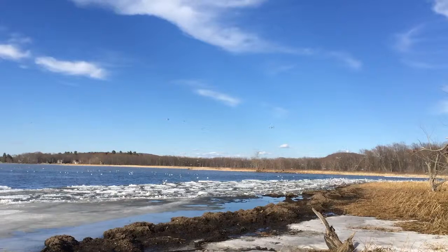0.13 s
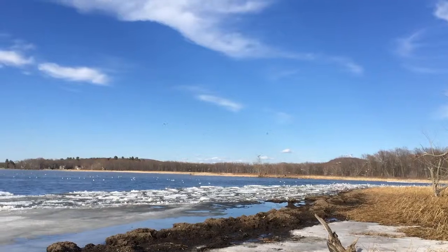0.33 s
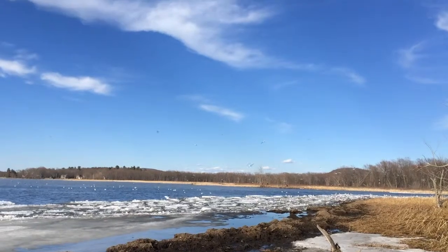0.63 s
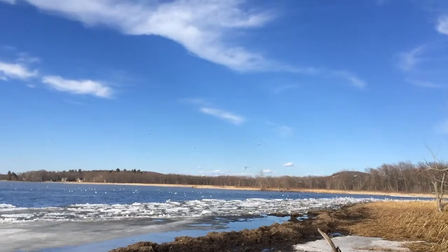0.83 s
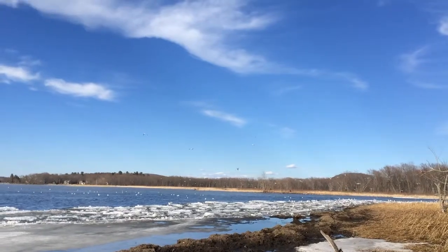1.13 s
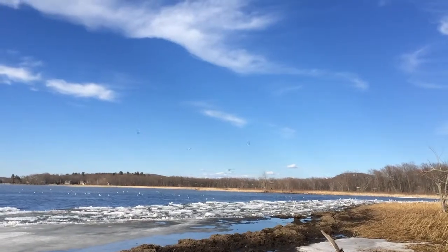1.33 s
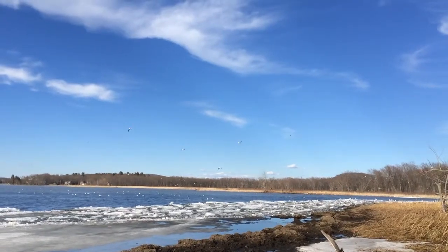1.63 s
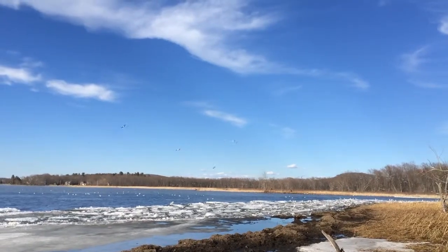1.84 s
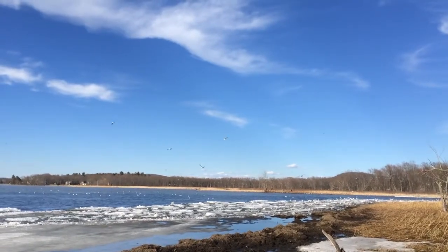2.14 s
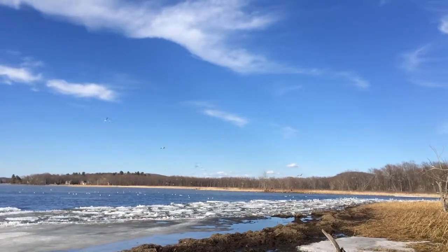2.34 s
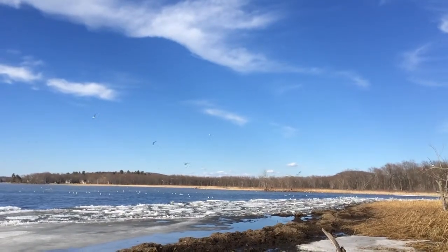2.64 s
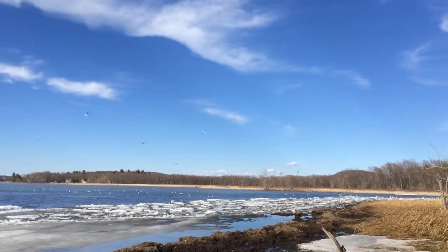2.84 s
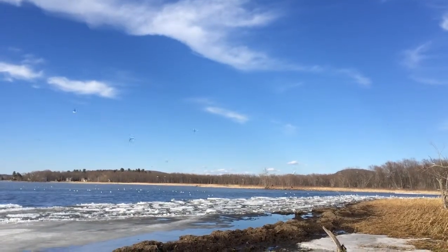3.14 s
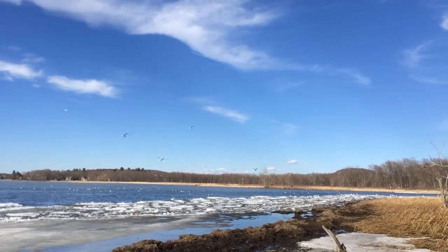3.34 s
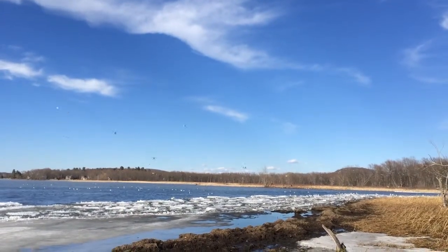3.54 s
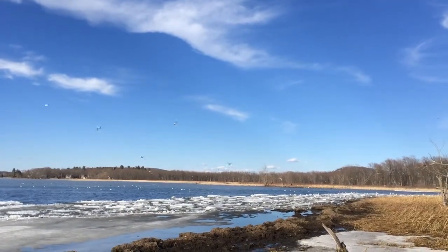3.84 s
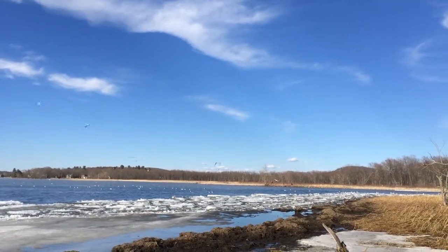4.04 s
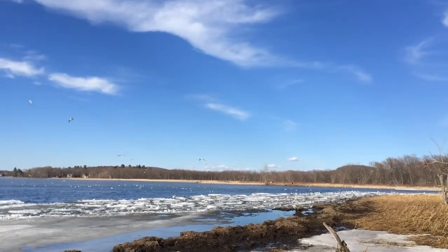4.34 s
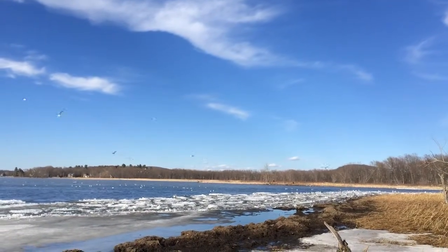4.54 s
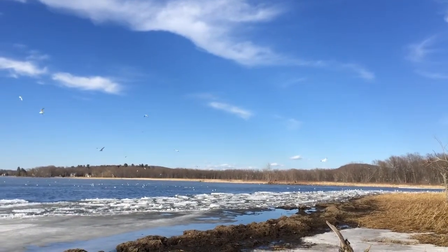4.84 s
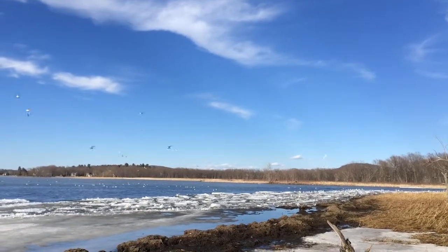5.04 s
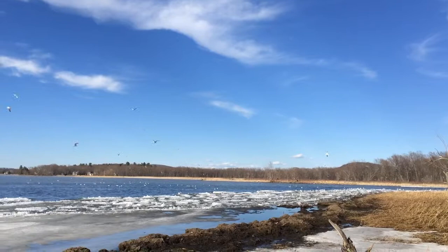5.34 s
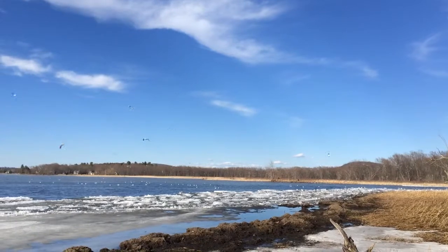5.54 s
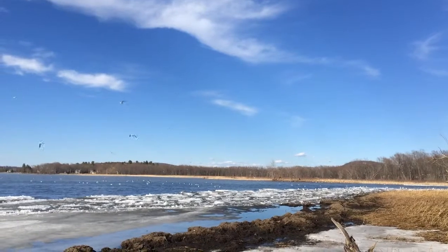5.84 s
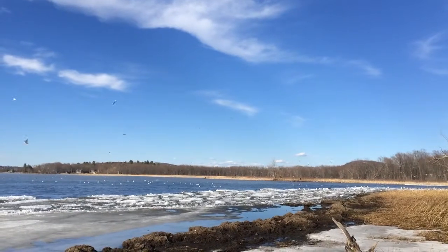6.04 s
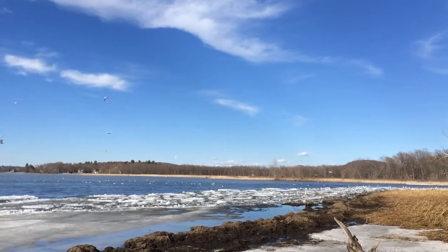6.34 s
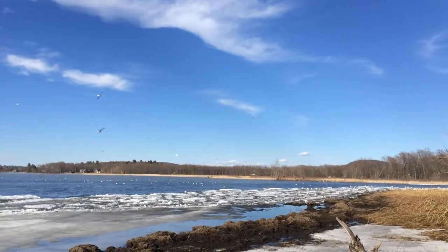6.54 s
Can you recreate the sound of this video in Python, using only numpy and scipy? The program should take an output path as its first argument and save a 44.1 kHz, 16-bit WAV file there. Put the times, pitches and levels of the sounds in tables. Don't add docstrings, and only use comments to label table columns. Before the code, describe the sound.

Outdoor lakeside scene on a small handheld microphone: overlapping gull cries, some close and piercing, others far and blurred with faint echoes from the shore. Loud wails come first, ringing whistles and a high cry midway, then a harsh scream and long mew near four seconds. Low wind thuds come in bursts, strongest late. Faint ice ticks and a barely audible grass rustle add detail.

```python
import sys
import numpy as np
from scipy import signal
from scipy.fft import rfft, irfft
from scipy.io import wavfile
from scipy.ndimage import uniform_filter1d

SR = 44100
rng = np.random.default_rng(int(sys.argv[2]) if len(sys.argv) > 2 else 0)


def ratio(d):
    e = np.asarray(d, float) / 20
    return 10 ** e


def pcm_store(signal):
    levels = np.round(np.clip(np.atleast_2d(signal), -1, 1) * 32767)
    wavfile.write(sys.argv[1], SR, levels.astype(np.int16).T)


N = 295029


def evened(x):
    return x / np.sqrt(np.mean(x ** 2) + 1e-20)


def add(mix, start_s, sound):
    part = mix[round(start_s * SR):][:len(sound)]
    part += sound[:len(part)]


def read(points, hz):
    f, value = np.transpose(points)
    return np.interp(np.log(hz + 1), np.log(f), value)


def coloured(x, points):
    gain = ratio(read(points, np.fft.rfftfreq(len(x), 1 / SR)))
    return irfft(rfft(x) * gain, len(x))


def curve(points):
    return np.interp(np.arange(N) / SR, *np.transpose(points))


def wander(n, hz):
    knots = rng.standard_normal(16 + n // 60)
    return np.interp(np.arange(n) * hz / SR, np.arange(len(knots)), knots)


def band(x, lo_hz, hi_hz, order=2):
    return signal.sosfilt(signal.butter(order, [lo_hz, hi_hz], "bandpass", fs=SR, output="sos"), x)


# frequency_hz, level_db
HISS_SPECTRUM = [(35, -40), (80, -7), (270, -10), (450, -5), (900, -3.5), (2000, -7), (3300, -13.5),
                 (5400, -22), (9000, -29.5), (15000, -36)]


def hiss():
    hz = np.fft.rfftfreq(512, 1 / SR)
    real, imaginary, patches = rng.standard_normal((N // 128 + 5, 257, 3)).T
    patches = uniform_filter1d(patches, 8, 0)
    patches = evened(uniform_filter1d(patches, 14, 1))
    patch_depth_db = np.interp(hz, [2500, 6000], [2.4, .8])[:, None]
    level_db = read(HISS_SPECTRUM, hz)[:, None] + patch_depth_db * patches
    spectrogram = (real + 1j * imaginary) * ratio(level_db)
    noise = signal.istft(spectrogram, nperseg=512, noverlap=384)[1][:N]
    return ratio(-57.5 + 0.5) * evened(noise)


# time_s, level_db
BREEZE = [(.12, -84), (.3, -77), (.62, -64), (1.8, -64.5), (1.9, -48.5), (2.37, -42.5), (2.45, -68),
          (2.6, -92), (3.19, -53), (3.76, -59.5), (3.9, -40), (4.2, -59), (4.3, -46), (4.72, -41),
          (5.85, -46), (5.97, -61.5), (6.2, -60.5), (6.3, -81)]
# peak_s, peak_db
PUFFS = [(.14, -62), (.57, -56), (.69, -50), (1.36, -50.5), (1.5, -57.5), (1.902, -40), (2.02, -38),
         (2.11, -38), (2.21, -40.5), (2.37, -48.5), (3.488, -42.5), (3.831, -44.5), (3.902, -38.5),
         (4.253, -38.5), (4.402, -39.5), (4.602, -33), (4.669, -33), (4.728, -33), (4.897, -32),
         (5.05, -32), (5.089, -40.5), (5.201, -38.5), (5.25, -39.5), (5.388, -32.5), (5.65, -39.5),
         (5.72, -38.5), (5.9, -47)]


def gusts():
    rise_db_per_s, fall_db_per_s = 340, 187
    t = np.arange(0, N / SR + .01, .001)
    puffs_db = [db - np.maximum(rise_db_per_s * (s - t), fall_db_per_s * (t - s)) for s, db in PUFFS]
    breeze_db = np.interp(t, *np.transpose(BREEZE))
    strength_db = np.maximum(breeze_db, np.max(puffs_db, axis=0))
    return np.interp(np.arange(N) / SR, t, strength_db)


# peak_s, peak_db, pitch_hz
KICKS = [(1.892, -27, 85), (2.013, -29, 61.9), (2.209, -22, 116), (2.284, -28, 112), (2.358, -30, 72.6),
         (3.49, -33, 68), (3.837, -23, 78.4), (4.245, -25, 70.4), (4.305, -26, 90), (4.567, -21.5, 92.5),
         (4.61, -25, 52), (4.659, -20, 167), (4.672, -22, 220), (4.715, -22.5, 178), (4.896, -20, 76.5),
         (5.054, -23, 157), (5.084, -21.5, 205), (5.186, -21.5, 68.5), (5.389, -34, 92), (5.192, -36, 230),
         (4.25, -35.5, 220), (2.38, -35.5, 198), (5.402, -27.5, 200), (5.33, -32.5, 190)]


def wind():
    gust_db = gusts() + 3.6 * np.clip(wander(N, 35), -2.5, .8)
    big, small, fine = rng.standard_normal((3, N))
    big_db = gust_db + 1.0 + np.minimum(gust_db + 56, 0)
    small_db = 1.88 * (gust_db + 36.5) - 40.0
    fine_db = 2 * (gust_db + 34) - 55.5
    out = ratio(big_db) * evened(band(big, 46.3, 110.2, order=3))
    out += ratio(small_db) * evened(band(small, 116.0, 187.0))
    out += ratio(fine_db) * evened(band(fine, 153, 420))
    for s, db, hz in KICKS:
        u = (np.arange(2000) / SR - .012) * hz * 3.68
        kick = (1 - 2 * u ** 2) * np.exp(-u ** 2)
        add(out, s - .005, ratio(db - 5.5) * rng.choice([-1, 1]) * kick)
    return band(out, 42, 4000)


# start_s, peak_db
TICKS = [
    (.5625, -57),
    (.9052, -65),
    (1.5438, -66),
    (1.8655, -64),
    (2.0327, -61),
    (2.126, -65),
    (2.8812, -65),
    (4.6647, -66),
    (5.3905, -63),
]


def ice():
    out = np.zeros(N)
    fade_db = -60 * np.arange(300) / SR / .012
    for (s, db), burst in zip(TICKS, rng.standard_normal((len(TICKS), 300))):
        add(out, s, ratio(db - 2.0 + fade_db) * burst)
    rustle_s, rustle_length_s, rustle_db = 5.85, .55, -77
    n = round(rustle_length_s * SR)
    grains = rng.standard_normal(n) * ratio(5.0 * wander(n, 160))
    add(out, rustle_s, ratio(rustle_db) * np.hanning(n) * evened(band(grains, 4500, 10000)))
    return band(out, 3000, 15000, order=1)


def shore(x):
    t = np.arange(SR // 2) / SR
    tail = rng.standard_normal(len(t)) * ratio(-60 * t / 0.63) * (t > .006)
    return signal.fftconvolve(x, band(tail / np.linalg.norm(tail), 330, 5000, order=1))[:N]


def voice(hz, level_db, colour_db, shake=0.0046, flutter_db=3.6, attack_s=0.0023, top_hz=15000):
    n, release_s, top_slope_db = len(hz), 0.0085, 17.0
    turns = np.cumsum(hz * (1 + shake * wander(n, 107.2))) / SR
    count = int(top_hz / hz.max())
    above = np.arange(max(count - len(colour_db), 0))
    pairs_db = np.resize(colour_db[-2:], len(above)) - top_slope_db * (above // 2 + 1)
    shares_db = np.r_[colour_db, pairs_db][:count]
    slack_db = .15 * (level_db - np.maximum.accumulate(level_db))
    slack_db -= 70 * (1 - hz / np.maximum.accumulate(hz))
    tone = np.zeros(n)
    for k, share_db in enumerate(shares_db, 1):
        if share_db > -50:
            dulling_db = np.clip(k * hz.max() / 2200 - 1, 0, 1.5) * slack_db
            harmonic_db = share_db + dulling_db + flutter_db * wander(n, 60.1)
            tone += ratio(harmonic_db) * np.sin(2 * np.pi * k * turns)
    tone *= 1 + .17 * wander(n, 420) + .14 * wander(n, 700)
    edge = np.minimum(np.arange(n) / attack_s, np.arange(n)[::-1] / release_s) / SR
    return np.sqrt(2) * ratio(level_db) * tone * np.clip(edge, 0, 1)


# time_s, level_db
CHORUS = [(.15, -53), (0.75, -53.5), (1.2, -55), (1.65, -56), (2.1, -51.5), (2.55, -52.5), (3.0, -54),
          (3.449, -57), (3.9, -54), (4.35, -54), (4.8, -53), (5.25, -55), (5.7, -63), (6.1, -54),
          (6.6, -55)]
# frequency_hz, level_db
FAR_AIR = [(600, -11.5), (1100, 0), (1600, -4), (2300, -6), (3500, -12.5), (5000, -15.5), (8000, -77)]


def far_gulls(count=190):
    out = np.zeros(N)
    for k, (at, pitch, length, size, bend, beak) in enumerate(rng.random((count, 6))):
        u = np.linspace(0, 1, round((.05 + .2 * length) * SR))
        if pitch < .35:
            base_hz = 700 + 750 * pitch
            colour_db = (-14, 0, -8 * beak, -5, -5, -10)
        else:
            base_hz = 1250 + 1150 * pitch ** 2.5
            colour_db = (0, -12 * beak, -10)
        hz = base_hz * (1 + .35 * u * (1.2 * bend - u))
        level_db = 6 * size - 8 * (2 * u - .8) ** 2
        call = voice(hz, level_db, colour_db, shake=0.012, flutter_db=4.5, top_hz=6100)
        add(out, (k + at) / count * N / SR, call)
    out = coloured(out, FAR_AIR)
    out = out / np.sqrt(uniform_filter1d(out ** 2, SR // 3) + 1e-9)
    return out * ratio(curve(CHORUS))


# start_s, length_s, level_db, upper_throat_lift_db
RASPS = [(0.323, 0.078, -60, -13), (1.065, 0.085, -51.5, -8), (1.654, 0.071, -47, 9), (2.426, 0.06, -47, 9),
         (2.549, 0.25, -54, 11), (3.224, 0.065, -49.5, 5), (3.738, 0.075, -55.5, 25),
         (3.846, 0.033, -45, 12), (3.893, .045, -44, 15), (3.964, 0.018, -44, 11), (4.262, 0.062, -45, 3),
         (4.696, 0.051, -51.5, 4), (5.105, 0.066, -57, 17), (5.279, 0.052, -54, 19),
         (5.574, 0.041, -57.5, 20), (6.416, 0.035, -50, -3), (3.88, .05, -55, 18), (4.737, 0.14, -56, 16),
         (4.952, 0.037, -56.5, 22), (4.4, .1, -52.5, 10), (6.459, .12, -56, 10), (6.65, 0.044, -51, 11)]
# frequency_hz, width_hz, level_db
THROAT = [(1750, 320, 20), (3400, 670, 9.5), (4530, 1030, 0), (6930, 3500, -12.5)]


def rasps():
    out = np.zeros(N)
    for s, length, db, lift_db in RASPS:
        n = round(length * SR)
        unevenness = (.03 + .5 * length) * wander(n, 250)
        turns = np.cumsum(np.linspace(480, 860, n) * (1 + unevenness)) / SR
        pulses = np.diff(np.floor(turns), prepend=0) * 8
        puffs = 0.25 * rng.standard_normal(n) * np.exp(-(turns % 1) / 0.5)
        throat = np.zeros(n)
        for hz, width_hz, mode_db in THROAT:
            mode = evened(band(pulses + puffs, hz - width_hz / 2, hz + width_hz / 2, order=3))
            throat += ratio(mode_db + lift_db * (hz > 3600)) * mode
        add(out, s, ratio(db + 2.2 * wander(n, 150)) * evened(throat) * np.hanning(n) ** .5)
    return out


# start_s, length_s, first_pitch_hz, last_pitch_hz, effort_db
WAILS = [(.4, 0.21, 1482, 1244, -40), (1.47, 0.21, 1522, 1206, -61), (1.57, 0.1, 1500, 1380, -57.5),
         (2.19, .135, 1564, 1324, -51), (2.505, 0.25, 1496, 1200, -46), (3.25, 0.11, 1400, 1220, -54),
         (3.495, 0.05, 1450, 1270, -49.5), (3.87, 0.053, 1420, 1626, -48.5), (4.02, 0.25, 1504, 1277, -52),
         (4.745, 0.2, 1477, 1264, -42), (5.23, 0.093, 1720, 1523, -55.5), (5.31, 0.23, 1723, 1258, -57.5)]
# start_s, length_s, first_pitch_hz, last_pitch_hz, effort_db
THIN_CALLS = [(.2, 0.16, 1485, 1725, -51), (.852, 0.03, 1870, 1990, -43), (.88, 0.036, 2150, 2020, -51.5),
              (.99, 0.15, 1590, 1670, -56), (1.26, 0.1, 1233, 1163, -58), (2.23, 0.087, 2235, 2220, -65),
              (2.33, 0.1, 1385, 1632, -52.5), (2.655, .04, 1870, 1800, -48), (2.8, .16, 2090, 2286, -56),
              (2.89, 0.078, 1480, 1420, -61), (3.12, 0.085, 1986, 2170, -55), (3.56, 0.055, 2034, 1940, -53),
              (4.1, 0.085, 2060, 2065, -61), (4.61, 0.24, 2240, 2435, -64), (5.61, 0.088, 5650, 5700, -66),
              (5.615, 0.055, 5000, 5200, -68), (5.77, 0.051, 1900, 1936, -57), (5.9, 0.09, 1630, 1950, -61),
              (6.169, 0.09, 1755, 1790, -59),
              (.46, .035, 3900, 3520, -64),
    (1.57, 0.092, 4520, 4410, -68),
    (2.002, .1, 2900, 2500, -64),
    (2.13, 0.076, 4520, 4330, -68),
    (3.49, 0.03, 4500, 4100, -69),
    (5.325, 0.049, 4440, 4650, -67),
    (6.325, .045, 1800, 1720, -52),
              (0.921, .05, 1980, 1850, -57), (.93, 0.046, 4800, 4600, -73),
                 (1.05, 0.075, 4480, 4420, -73), (1.08, .035, 2880, 3100, -58),
                 (1.3, 0.067, 1233, 1443, -56.5), (2.82, .08, 2900, 2700, -69),
                 (3.12, .12, 1450, 1504, -56), (3.496, 0.052, 1930, 1960, -54),
                 (3.569, 0.083, 1420, 1397, -58), (3.57, 0.053, 4450, 4280, -65),
                 (4.11, .03, 6630, 6400, -63.5), (4.135, 0.04, 1903, 1060, -52),
                 (4.77, 0.056, 2200, 2150, -59), (4.79, .04, 5900, 6350, -66), (4.88, .05, 1890, 2000, -54),
                 (5.075, .07, 1600, 1246, -51.5), (5.2, .045, 2320, 2280, -57.5),
                 (5.301, .045, 2500, 2650, -58), (5.343, .1, 1906, 1703, -62.5),
                 (5.33, 0.22, 2247, 2510, -60.5), (6.03, .1, 1640, 1800, -58.5),
                 (6.26, 0.056, 1750, 1500, -65), (6.29, .06, 3040, 2800, -61),
                 (6.601, 0.033, 1960, 2270, -55), (6.63, .035, 2280, 2290, -55),
                 (3.386, .04, 1760, 1880, -45), (3.21, 0.039, 2150, 2060, -54),
                 (2.17, 0.041, 1840, 1930, -54), (2.34, .05, 3600, 4230, -64.5),
                 (5.604, 0.073, 3820, 3840, -65), (4.83, .06, 6380, 6650, -70),
                 (4.892, 0.1, 6670, 6480, -68.5), (4.62, .06, 4480, 4750, -71),
                 (5.23, .04, 5100, 4800, -62), (2.775, 0.08, 1650, 1370, -44),
                 (6.468, 0.047, 1650, 1610, -57),
              (1.845, .055, 1330, 1520, -51), (1.77, .06, 3050, 3150, -62), (3.33, .1, 835, 930, -57),
          (4.0, .15, 720, 690, -67), (.72, .06, 4600, 4200, -65), (2.6, .08, 1560, 1620, -51),
          (5.82, .06, 2520, 2450, -61), (4.77, .07, 3950, 4050, -62), (5.58, .03, 2800, 2950, -65),
          (1.25, .035, 1600, 1480, -53), (2.565, .025, 2050, 2050, -46), (2.6, .06, 1990, 1870, -47),
          (2.715, .06, 1720, 1650, -50), (2.85, .055, 2780, 2740, -60), (2.8, .07, 3420, 3500, -64),
          (2.775, .03, 1800, 1960, -53), (3.99, .09, 3150, 2850, -62), (4.98, .06, 4600, 4100, -63),
          (4.93, .05, 2000, 1960, -56), (.545, .025, 3000, 3400, -61), (.85, .025, 2850, 2950, -61),
          (2.45, .06, 3400, 3680, -55), (2.67, .04, 2500, 2720, -60), (2.675, .025, 4050, 4350, -60),
          (1.875, .03, 4700, 4300, -62),
              (3.85, .026, 1560, 1920, -50), (3.873, .05, 4400, 4440, -49), (3.92, .035, 4430, 4150, -52),
          (3.872, .07, 2200, 2200, -53), (1.195, .045, 3900, 3920, -61), (1.135, .065, 3220, 3300, -58),
          (4.29, .04, 1850, 1900, -48), (4.27, .022, 1850, 2000, -52), (4.53, .06, 1540, 1380, -54),
          (6.48, .04, 3700, 3620, -61), (4.226, .03, 8000, 8300, -72), (6.55, .11, 4850, 4950, -64),
          (4.405, .02, 1780, 1760, -46), (4.455, .04, 4200, 4000, -62)]
# start_s, length_s, first_pitch_hz, last_pitch_hz, effort_db
ARCHED_WHISTLES = [
    (1.08, 0.18, 1500, 1575, -53),
    (1.83, 0.055, 2520, 2620, -54.5),
    (2.79, 0.067, 4770, 4000, -61),
    (4.88, 0.16, 2370, 2110, -58),
    (5.57, .15, 2280, 1895, -57.5),
]
# start_s, length_s, first_pitch_hz, last_pitch_hz, effort_db
CRIES = [
    (.12, 0.019, 1707, 1460, -46.5),
    (1.89, 0.22, 1677, 1598, -54),
    (2.505, .1, 2220, 1990, -42.5),
    (2.56, 0.14, 1725, 1590, -50),
    (2.705, .075, 2070, 2020, -52),
    (4.83, .14, 1622, 1636, -51),
    (4.69, 0.039, 1540, 1703, -52.5),
]
# start_s, length_s, first_pitch_hz, last_pitch_hz, effort_db
ARCHED_CRIES = [
    (.36, .125, 1570, 1490, -44.5),
    (.7, 0.14, 1570, 1530, -48),
    (1.37, 0.275, 1620, 1560, -52),
    (1.89, 0.24, 1663, 1678, -44.5),
]
# start_s, length_s, first_pitch_hz, last_pitch_hz, effort_db
SCREAMS = [
    (3.975, 0.103, 2065, 1960, -41),
    (4.078, .055, 1900, 1840, -48),
]
# start_s, length_s, first_pitch_hz, last_pitch_hz, effort_db
ARCHED_SCREAMS = [
    (5.668, .1, 1870, 1850, -56),
]
# start_s, length_s, first_pitch_hz, last_pitch_hz, effort_db
SHRIEKS = [
    (5.178, .05, 1940, 2105, -52),
    (5.228, .075, 2105, 1945, -51),
]
# start_s, length_s, first_pitch_hz, last_pitch_hz, effort_db
MEWS = [
    (3.333, 0.062, 834, 868, -47),
    (4.3, 0.15, 838, 860, -42.5),
    (4.46, 0.071, 820, 780, -50),
]
# start_s, length_s, first_pitch_hz, last_pitch_hz, effort_db
DULL_MEWS = [
    (6.418, 0.03, 830, 950, -47.5),
    (6.445, 0.055, 975, 1009, -50),
    (6.515, 0.059, 970, 938, -51),
    (2.665, 0.053, 810, 895, -51.5),
    (3.435, 0.06, 1000, 960, -52.5),
]
# start_s, length_s,
# first_pitch_hz, last_pitch_hz, effort_db
LATE_GLIDING_MEWS = [
    (1.71, .21, 834, 663, -43),
    (4.89, .19, 824, 820, -47),
    (6.55, .148, 800, 815, -48.5),
]
# start_s, length_s, first_pitch_hz, last_pitch_hz, effort_db
BRIGHT_MEWS = [
    (3.925, 0.06, 790, 806, -40.5),
    (3.902, .026, 850, 822, -42),
]
# start_s, length_s, first_pitch_hz, last_pitch_hz, effort_db
OPEN_MEWS = [
    (3.283, .05, 820, 828, -54),
    (3.85, .026, 770, 960, -56),
    (3.882, .024, 720, 850, -58),
    (3.962, .018, 800, 860, -53),
    (1.658, .02, 720, 780, -60),
    (1.683, .024, 790, 850, -57),
]
# start_s, length_s, first_pitch_hz, last_pitch_hz, effort_db
YELPS = [
    (3.635, 0.1, 850, 862, -56.5),
    (3.752, 0.037, 740, 890, -54),
    (3.78, 0.096, 897, 950, -43.5),
    (5.61, 0.1, 630, 640, -60.5),
    (5.135, 0.084, 920, 945, -53),
    (2.435, 0.025, 905, 960, -51),
    (.638, .07, 890, 950, -54),
    (.708, .055, 950, 865, -57),
]
# start_s, length_s, first_pitch_hz, last_pitch_hz, effort_db
CHATTER = [
    (.565, 0.06, 943, 900, -57),
    (5.945, 0.066, 838, 788, -54.5),
    (6.025, 0.06, 780, 860, -55),
    (6.105, 0.067, 891, 830, -56.5),
    (6.18, 0.065, 852, 810, -57),
    (6.26, 0.043, 842, 787, -56),
]
# start_s, length_s, first_pitch_hz, last_pitch_hz, effort_db
RINGING = [
    (2.39, 0.052, 1760, 1850, -46.5),
    (2.432, .075, 1850, 1885, -38.5),
    (2.472, 0.037, 1790, 1835, -35.5),
    (1.195, .045, 1950, 1960, -54),
    (1.15, 0.05, 1610, 1640, -51),
]
# level_db # whole-throated calls, the first harmonic strong, save
WAIL, WHISTLE, CRY = (-1, -19.5, -19, -32.5), (1.5, -24, -42, -49), (-2.5, -6.5, -30, -36)
SCREAM, SHRIEK, RING = (-6, 1.5, -13.5, -16.5, -40, -32, -40), (-2.5, -5.5, -10, -25), (-0.5, -15, -31, -38)
MEW, DULL_MEW, LATE_GLIDING_MEW = (-22, 1.5, -25, -8, -18.5, -21.5, -31, -33), (-13, -1, -13.5, -13, -21, -27, -32, -34), (-29, 1, -23, -13, -14, -27, -34, -36)
BRIGHT_MEW, OPEN_MEW = (-28, 0, -28, -15, -9, -21, -17, -27, -23, -24), (-10, -2, -10, -1, 0.5, -17, -23, -29)
YELP, CHAT = (-14, -15, -2, -10, -11.5, -20), (-13, -8, 0, -13.5, -17, -19.5)


def near_gulls():
    out = np.zeros(N)
    thin = THIN_CALLS
    # calls, colour, arch (share of the pitch per second of call), droop (above 1 holds, then glides), attack_s
    kinds = [(WAILS, WAIL, 0, 1, .0023),
             (thin, WHISTLE, 0, 1, .0023),
             (ARCHED_WHISTLES, WHISTLE, .5, 1, .0023),
             (CRIES, CRY, 0, 1, .0023),
             (ARCHED_CRIES, CRY, .5, 1, .018),
             (SCREAMS, SCREAM, 0, 3.5, .0023),
             (ARCHED_SCREAMS, SHRIEK, .69, 1, .0023),
             (MEWS, MEW, 0, 1, .0023),
             (DULL_MEWS, DULL_MEW, 0, .407, .0023),
             (LATE_GLIDING_MEWS, LATE_GLIDING_MEW, .15, 3.5, .0023),
             (YELPS, YELP, 0, 1, .0023),
             (BRIGHT_MEWS, BRIGHT_MEW, 0, 1, .0023),
             (CHATTER, CHAT, .15, 1, .0023),
             (SHRIEKS, SHRIEK, 0, 1, .0023),
             (OPEN_MEWS, OPEN_MEW, 0, 1, .0023),
             (RINGING, RING, 0, 1, .0023)]
    for calls, colour_db, arch_per_s, droop, attack_s in kinds:
        for s, length, first_hz, last_hz, db in calls:
            u = np.linspace(0, 1, round((length + 0.0069) * SR))
            long_s = max(length - .13, 0)
            arch = 1 - abs(2 * u ** (1 + 7.0 * long_s) - 1) ** (2 + 3.15 * long_s)
            glide_hz = first_hz + (last_hz - first_hz) * u ** droop
            hz = glide_hz * (1 + arch_per_s * length * arch)
            hz = hz * (1 + 0.004 * wander(len(u), 25.44))
            swell_db = -1.5 * np.clip(1 - u / 0.29, 0, 1)
            fade_db = -3 * u ** 3.9
            add(out, s - .003, voice(hz, db + swell_db + fade_db, colour_db, attack_s=attack_s))
    return out


def scene():
    air = hiss() + wind()
    far = far_gulls()
    near = rasps() + near_gulls()
    echoes = shore(ratio(-15.0) * near + ratio(-5.5) * far)
    return (near + ratio(-0.5) * far + echoes + air + ice())[None]


def low_pass(x):
    return signal.sosfilt(signal.butter(12, 15250, fs=SR, output="sos"), x)


def record(dry):
    start_s = .1195
    return low_pass(dry * (np.arange(N) >= start_s * SR))


dry = scene()
out = record(dry)
pcm_store(out)
```